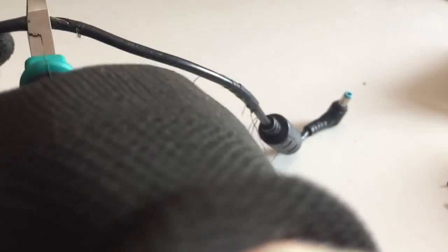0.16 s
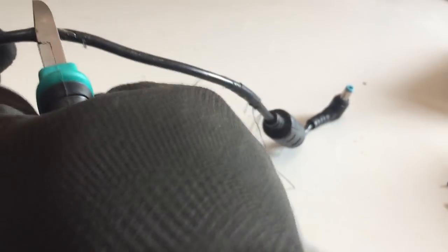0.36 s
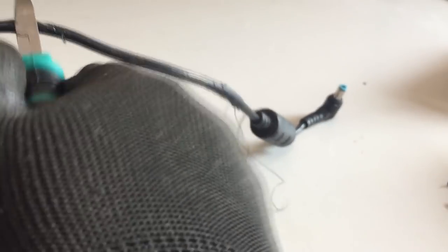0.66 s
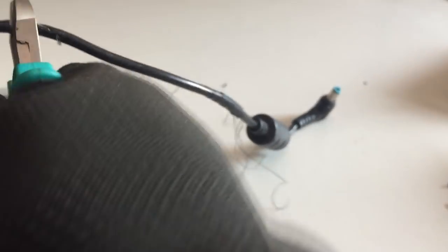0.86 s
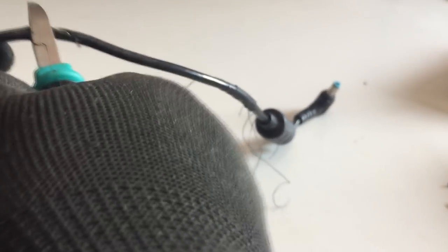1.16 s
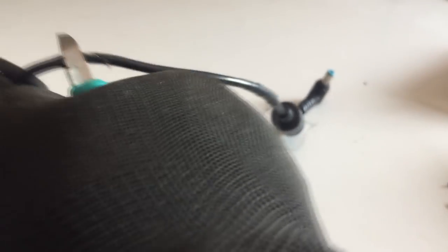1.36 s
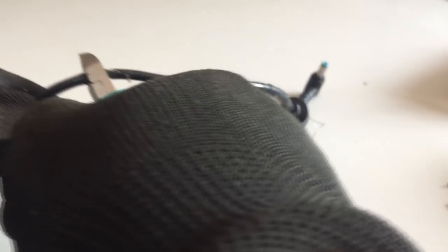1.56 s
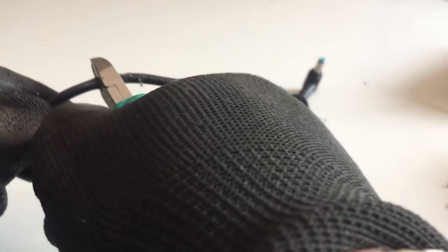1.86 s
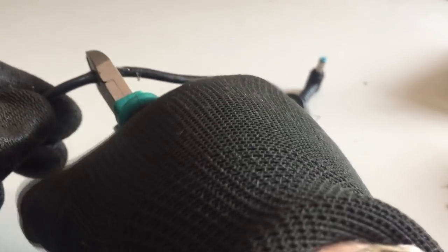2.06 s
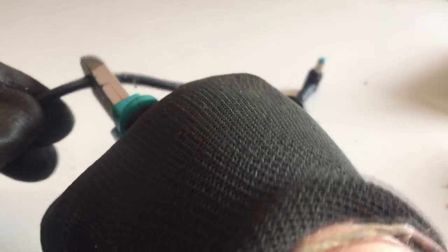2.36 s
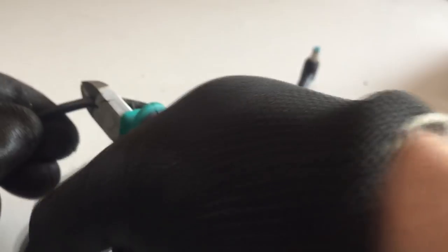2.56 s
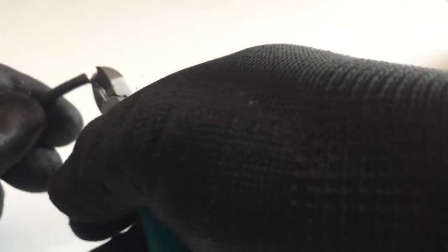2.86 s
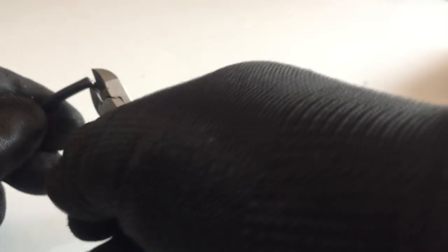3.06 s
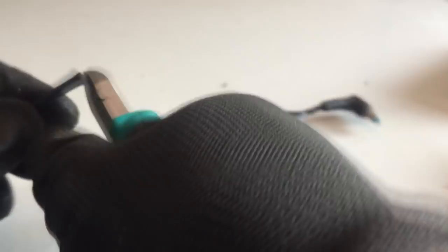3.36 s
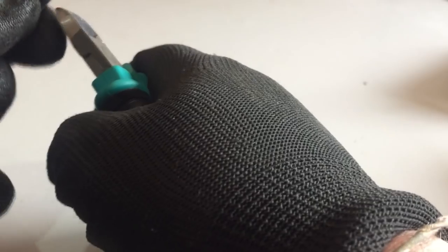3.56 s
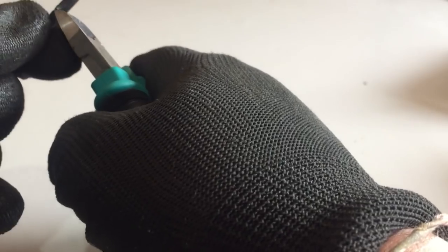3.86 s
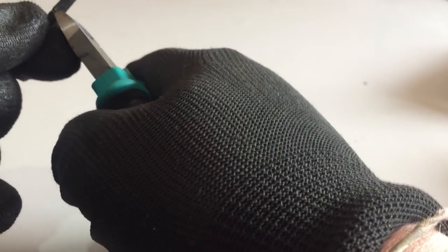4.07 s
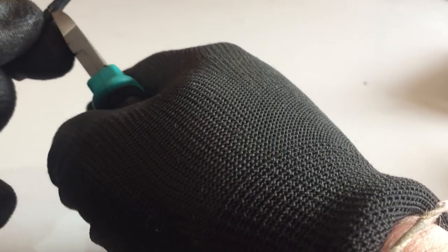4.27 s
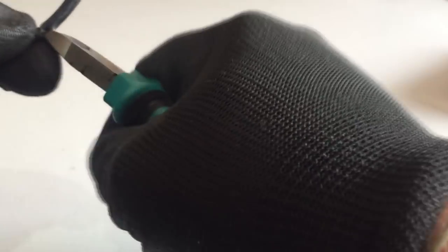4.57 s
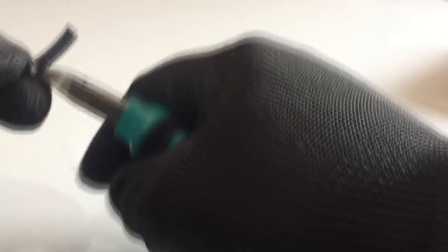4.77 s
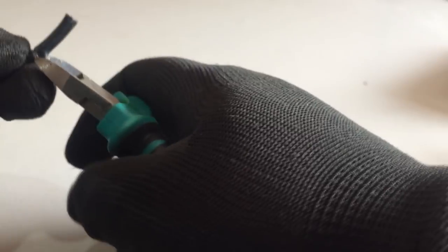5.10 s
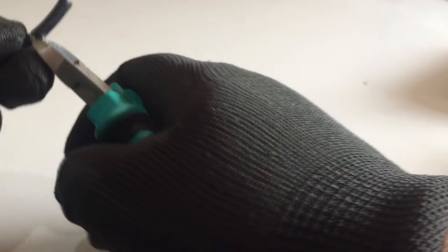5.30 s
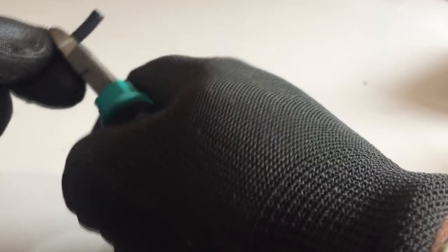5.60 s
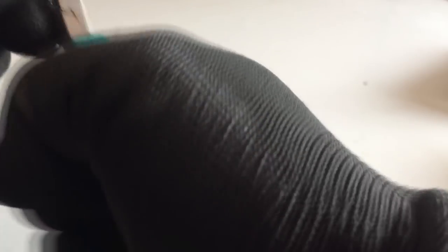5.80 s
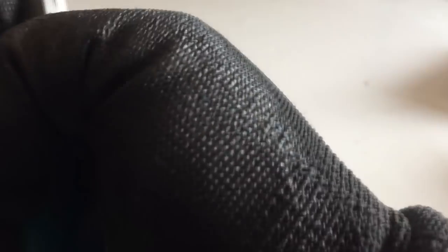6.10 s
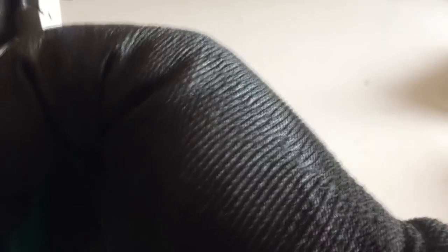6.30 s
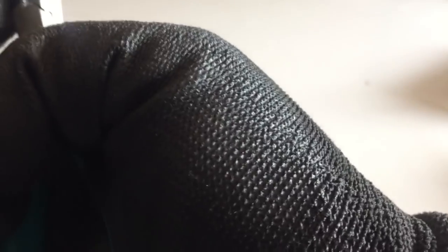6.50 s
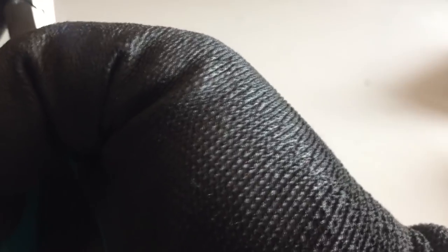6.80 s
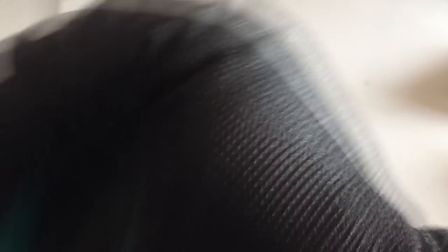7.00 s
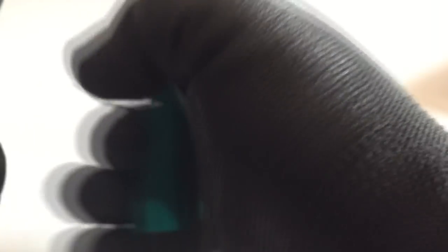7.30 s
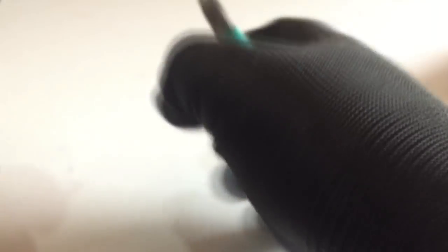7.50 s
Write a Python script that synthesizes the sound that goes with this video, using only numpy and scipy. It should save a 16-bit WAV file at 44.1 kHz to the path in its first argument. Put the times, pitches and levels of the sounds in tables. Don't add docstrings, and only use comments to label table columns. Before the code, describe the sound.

Close phone pickup at a workbench in a quiet, slightly live room with low rumble and soft hiss. Faint glove rubs and distant bird whistles lead to one loud, blunt cable snap with a woody bench boom. The plug end bounces in a quick clatter, cut off abruptly. Sparse ticks follow, then a crackling tear with two crisp snaps, glove crackles and a small hollow tube skipping on the bench.

```python
import sys
import numpy as np
from scipy import signal
from scipy.fft import rfft, irfft
from scipy.io import wavfile
from scipy.ndimage import uniform_filter1d

SR = 44100
rng = np.random.default_rng(int(sys.argv[2]) if len(sys.argv) > 2 else 0)


def generate_wav(sig):
    pcm = np.round(np.clip(np.atleast_2d(sig).T, -1, 1) * 32767).astype(np.int16)
    wavfile.write(sys.argv[1], SR, pcm)


def ratio_of_db(decibels):
    return 10 ** (np.asarray(decibels, float) / 20)


N = 337365
CHANGE_S = 3.5112

# start_s, peak_db, colour_hz, room_db, bench_db
SNAP = [
    (2.2043, -8.5, 2595, -26.5, -30.5),
]
# start_s, peak_db,
# colour_hz, room_db, bench_db
KNOCKS = [(.0864, -35.5, 425, -30.5, -61.5), (.0872, -43.5, 2030, -17.5, -78.5),
          (2.6038, -33.5, 503, -28, -49.5), (2.632, -51, 1100, -25, -85), (2.9986, -24, 694, -29, -56.5),
          (3.0025, -31, 420, -20.5, -53), (3.0222, -23.5, 1137, -20, -83),
          (3.0256, -30, 1740, -15.5, -49.5), (3.0365, -43, 1980, -20, -70), (3.0475, -49, 1700, -19, -70),
          (3.0505, -34, 1500, -16, -70), (3.0565, -42, 1250, -9, -73), (3.0635, -39, 1200, -14, -72),
          (3.3285, -33, 600, -20.5, -59), (3.3463, -41.5, 815, -21.5, -63),
          (3.4595, -43.5, 1950, -15, -51.5), (3.4902, -33, 682, -23, -57), (3.4974, -37.5, 453, -35, -75),
          (3.5059, -24, 950, -9, -55), (7.4085, -40, 300, -32, -60.5)]


def log_read(table, hz):
    f, value = np.transpose(table)
    return np.interp(np.log(np.maximum(hz, 1)), np.log(f), value)


def filtered(x, gain_at):
    y = irfft(rfft(x) * gain_at(np.fft.rfftfreq(len(x), 1 / SR)), len(x))
    return y / np.std(y)


def add(out, start_s, x):
    i = int(round(start_s * SR))
    a, b = max(i, 0), min(i + len(x), N)
    out[a:b] += x[a - i:b - i]


def walk(rate_hz, size):
    hold = max(int(SR / rate_hz), 1)
    levels = np.repeat(rng.standard_normal(size // hold + 1), hold)
    return np.sqrt(1.5) * uniform_filter1d(levels, hold)[:size]


def rings(t, hz, width, gain, phase, lag_s, push_s):
    t = np.maximum(t - lag_s * np.sqrt(500 / hz), 0)
    push = 1 - np.exp(-(t / push_s) ** 2)
    decay = np.exp(-np.pi * width * t)
    return (gain * decay * np.sin(2 * np.pi * hz * t + phase) * push).sum(0)


def hits(rows, modes, reach_octaves, push_cycles, lag_s, scatter_db, crack_db, dry, send):
    hz, width, db = np.transpose(modes)[:, :, None]
    t = np.arange(SR // 40) / SR
    f = np.fft.rfftfreq(len(t), 1 / SR)
    turns = np.pi * np.arange(len(modes))[:, None]
    chance = rng.standard_normal((len(rows), 3, len(modes), 1))
    cracks = np.diff(rng.standard_normal((len(rows), len(t) + 1))) * np.exp(-t / 0.00048)
    blows = np.array(rows)[:, :4]
    for (start_s, peak_db, colour_hz, room_db), (detune, weight, phase), crack in zip(blows, chance, cracks):
        reach = np.where(hz > colour_hz, reach_octaves[1], reach_octaves[0])
        gain = ratio_of_db(db) * np.exp(-(np.log2(hz / colour_hz) / reach) ** 2)
        ring = rings(t, hz * (1 + 0.02 * detune), width, gain * ratio_of_db(scatter_db * weight),
                     turns + 0.5 * phase, lag_s, push_cycles / colour_hz)
        ring = ring / np.abs(ring).max() + ratio_of_db(crack_db) * crack
        add(dry, start_s - lag_s * np.sqrt(500 / colour_hz), ratio_of_db(peak_db) * ring)
        power = (gain ** 2 / width / (1 + ((f - hz) / (0.62 * width)) ** 4)).sum(0)
        power = power * f ** 2 / (f ** 2 + 900 ** 2)
        blur = np.fft.fftshift(irfft(np.sqrt(power), len(t)))
        blur = blur * np.linalg.norm(ring) / np.linalg.norm(blur)
        add(send, start_s - t[-1] / 2, blur * ratio_of_db(peak_db + room_db + 12.0))


def cable_snap(dry, send):
    # mode_hz, width_hz, level_db
    jaw_modes = [(423, 1100, 10.5), (1900, 690, 7), (3700, 1300, 2), (4800, 680, -3), (6700, 960, -0.5),
                 (8280, 1500, -33.5), (11700, 1300, -28.5), (14620, 1000, -28.5)]
    hits(SNAP, jaw_modes, reach_octaves=(4.0, 4.1), push_cycles=.85, lag_s=0.00024,
         scatter_db=0., crack_db=-20.0, dry=dry, send=send)


def plug_knocks(dry, send):
    # mode_hz, width_hz, level_db
    plug_modes = [(248, 280, 16), (420, 118, 4.5), (767, 256, 5.5), (980, 207, 4.5), (1350, 700, 13),
                  (1950, 410, -1.5), (2380, 300, 2), (3500, 250, -5), (4100, 180, -18), (6200, 1500, -14)]
    hits(KNOCKS, plug_modes, reach_octaves=(1.3, 1.4), push_cycles=0.33, lag_s=0.00038,
         scatter_db=0.25, crack_db=-55, dry=dry, send=send)


def sheath_skips(dry, send):
    # mode_hz, width_hz, level_db
    tube_modes = [(383, 310, 12), (910, 350, -1), (1620, 890, 0), (1950, 590, -3), (2570, 300, -4.5),
                  (3160, 290, -8.5), (3880, 800, -6), (4800, 790, -15), (6600, 810, -33), (9200, 420, -26),
                  (12000, 830, -12)]
    # start_s, peak_db, colour_hz, room_db
    skips = [
        (7.4068, -24.5, 2180, -16.5),
        (7.4093, -35, 2230, -44),
        (7.4144, -38, 714, -36),
        (7.4502, -39.5, 1900, -11),
        (7.4613, -35.5, 2020, -26),
        (7.5053, -43.5, 1300, -12.5),
        (7.5332, -39, 2350, -24),
        (7.554, -55, 7000, -29),
    ]
    # start_s, peak_db, colour_hz, room_db
    wobbles = [(7.4125, -48, 2600, -30), (7.433, -43, 1710, -18), (7.4365, -43, 1950, -25),
               (7.4405, -44, 2300, -33), (7.4545, -45, 1700, -18), (7.4635, -36, 2680, -25),
               (7.470, -41.5, 1900, -17), (7.489, -48, 2800, -25), (7.508, -43, 2680, -31),
               (7.517, -45, 2000, -26), (7.521, -52, 2200, -24), (7.5355, -43.5, 2700, -32),
               (7.545, -53, 2600, -26), (7.559, -51, 1800, -28)]
    hits(skips, tube_modes, reach_octaves=(1.5, 2.2), push_cycles=0.14, lag_s=0.0012,
         scatter_db=1.7, crack_db=-39, dry=dry, send=send)
    hits(wobbles, tube_modes, reach_octaves=(.4, .4), push_cycles=0.93, lag_s=0,
         scatter_db=1.2, crack_db=-56, dry=dry, send=send)


def fingertip_pops(dry, send):
    # start_s, peak_db, colour_hz, room_db
    pops = [(7.0765, -44.5, 1900, -21), (7.078, -41.5, 2800, -28), (7.083, -49, 2380, -28),
            (7.0905, -41, 2940, -25), (7.097, -49, 5600, -25), (7.102, -52, 2200, -23),
            (7.1068, -48, 6200, -22), (7.1185, -46, 6340, -22), (7.1227, -47, 5700, -25),
            (7.1262, -50, 3600, -22), (7.130, -46, 6700, -25), (7.1473, -40, 5900, -25),
            (7.154, -52, 5900, -28), (7.2315, -54, 6000, -29), (7.248, -59, 1900, -21),
            (7.2585, -56, 2050, -27), (7.264, -55, 2400, -25), (7.281, -50, 6300, -25),
            (7.2895, -46, 6200, -21), (7.2897, -52, 2400, -29), (7.2945, -43.5, 6000, -27),
            (7.302, -55, 2600, -28), (7.3057, -42, 6200, -23), (7.3095, -50, 6200, -27),
            (7.3172, -42.5, 3480, -32)]
    # mode_hz, width_hz, level_db
    grip_modes = [(1850, 260, 0), (2500, 500, -3), (3630, 440, 5), (5840, 600, -2), (6450, 720, 2),
                  (7700, 800, 0)]
    hits(pops, grip_modes, reach_octaves=(.3, .3), push_cycles=0.99, lag_s=0,
         scatter_db=1.2, crack_db=-60, dry=dry, send=send)


def blade_ticks(dry, send):
    # mode_hz, width_hz, level_db
    blade_modes = [(1800, 500, 13), (2550, 490, 1.5), (4000, 900, -1.5), (6334, 840, -2.5),
                   (9150, 1020, -5.5), (10900, 1700, -5), (13900, 1100, -8), (15500, 1100, -17)]
    # start_s, peak_db, colour_hz, room_db
    partings = [
        (2.2113, -34, 2560, -17),
        (2.2472, -44.5, 2820, -46),
        (6.1504, -17.5, 4900, -33),
        (6.174, -18.5, 4800, -31.5),
    ]
    # start_s, peak_db, colour_hz
    nicks = [(3.4598, -43, 4800), (4.4719, -71, 6130), (4.4967, -47, 7200), (4.5668, -48.5, 4200),
             (4.5705, -45.5, 4800), (4.5862, -53, 5550), (4.6513, -51, 6860), (4.6678, -51.5, 5020),
             (4.6899, -51.5, 6180), (4.7261, -45.5, 5960), (6.7733, -40.5, 6955), (6.8107, -56, 3790),
             (6.8942, -58.5, 4100), (6.9994, -53, 4900)]
    # start_s, peak_db, colour_hz
    tears = [(6.0088, -59, 6400), (6.0118, -40.5, 5040), (6.0737, -54, 3020), (6.0894, -45, 4300),
             (6.0946, -43, 5880), (6.099, -40, 3900), (6.1028, -43, 8450), (6.1202, -39, 4240),
             (6.1253, -39, 6770), (6.1443, -42, 5820), (6.1989, -54, 5510), (6.2819, -42, 7360)]
    # start_s, peak_db, colour_hz
    catches = [(7.1261, -40, 5390), (7.1448, -34.5, 7100), (7.2216, -46, 5230), (7.2305, -46, 5960),
               (7.2586, -49, 3500), (7.3057, -45, 5950), (7.5332, -46.5, 5000)]
    ticks = [*partings]
    for rows, room_db in ((nicks, -20.5), (tears, -16.5), (catches, -15.5)):
        ticks += [(*row, room_db) for row in rows]
    thin, thin_send = np.zeros(N), np.zeros(N)
    hits(ticks, blade_modes, reach_octaves=(.85, 1.9), push_cycles=0.26, lag_s=0,
         scatter_db=2.4, crack_db=-18.0, dry=thin, send=thin_send)
    small = signal.butter(10, 1620, "high", fs=SR, output="sos")
    dry += signal.sosfilt(small, thin)
    send += signal.sosfilt(small, thin_send)


def bench_boom(out):
    # mode_hz, level_db, t60_s
    bench_modes = [(58, -3.5, 0.73), (67, -11, .25), (105.9, 7.5, 0.13), (126, -4, 0.76), (138, -14, .12),
                   (197, -7.5, 0.31), (207.7, -9.5, 0.16), (284, -18, 0.63), (296, -13, 0.45),
                   (333.6, -16.5, 0.26), (381.5, -13.5, 0.27), (387.3, -10, 0.35), (497, -20.5, 0.11),
                   (716, -26, 0.4)]
    t = np.arange(SR) / SR
    hz, db, t60_s = np.transpose(bench_modes)[:, :, None]
    width = np.log(1000) / np.pi / t60_s
    for rows, tilt in ((SNAP, 0), (KNOCKS, .8)):
        waver_db = 2.9 * np.array([walk(33, SR) for _ in bench_modes])
        gain = ratio_of_db(db + waver_db) * (hz / 200) ** tilt
        boom = rings(t, hz, width, gain, phase=0, lag_s=0.0016, push_s=0.0046)
        boom = boom * (1 + 0.71 * np.exp(-t / 0.0064))
        boom = boom * (1 - np.exp(-((t - .042) / 0.0037) ** 2))
        for start_s, *_, bench_db in rows:
            heard = np.clip((CHANGE_S - start_s - t) / .002, 0, 1) if start_s < CHANGE_S else 1
            add(out, start_s, ratio_of_db(bench_db) * boom * heard)


def hand_bumps(out):
    # start_s, peak_db, pitch_hz, cycles
    bumps = [
        (1.751, -57.5, 129, 19.5),
        (2.10, -56, 127, 4.8),
        (6.195, -57.5, 126, 2.6),
        (7.0789, -33, 76, 1.3),
        (7.094, -49, 62.4, 2),
    ]
    for start_s, db, hz, cycles in bumps:
        t = np.arange(int(SR * cycles / hz)) / SR
        swell = np.sin(np.pi * t * hz / cycles)
        add(out, start_s, -ratio_of_db(db) * swell * np.sin(2 * np.pi * hz * t))


def friction(out, start_s, length_s, db, hz, width_hz, hiss_db):
    # frequency_hz, level_db
    fabric_hiss = [(3000, -7), (4900, -10.5), (5700, 3.5), (6500, -0.5), (7600, -5), (8800, -1.5),
                   (10500, -10.5), (12000, -6), (14500, -8), (16000, -20)]
    n = int(length_s * SR)
    grip_db = 4.9 * np.minimum(rng.exponential(size=SR // 2), 4) + 1.7 * walk(250, SR // 2)
    grain = rng.standard_normal((2, SR // 2)) * ratio_of_db(grip_db)
    body = filtered(grain[0], lambda f: 1 / (1 + ((f - hz ** 2 / (f + 1)) / width_hz) ** 2))
    hiss = filtered(grain[1], lambda f: ratio_of_db(log_read(fabric_hiss, f)))
    swell = np.sin(np.pi * np.arange(n) / n) ** 0.33
    add(out, start_s, ratio_of_db(db) * swell * (body + ratio_of_db(hiss_db) * hiss)[:n])


def glove_slips(out):
    # start_s, length_s, level_db, pitch_hz, hiss_db
    slips = [(.006, 0.038, -66.5, 3340, 4), (0.052, 0.041, -64.5, 2980, -1),
             (0.588, 0.055, -68.5, 3200, -1.5), (0.61, 0.031, -65, 3340, 1.5),
             (0.786, 0.069, -65.5, 3200, -5.5), (3.266, 0.037, -71.5, 4000, -10.5),
             (3.387, 0.099, -68, 4000, -20), (4.362, 0.41, -89, 3800, 12.5),
             (6.082, 0.045, -65.5, 4100, -1), (6.272, 0.34, -78.5, 4100, -28),
             (7.074, 0.012, -52.5, 2400, -3), (7.081, 0.054, -58.5, 2500, 6),
             (7.107, 0.054, -65, 2400, 8.5), (7.213, 0.079, -67.5, 2100, 3.5),
             (7.262, 0.06, -68.5, 2200, 7), (7.286, 0.041, -67.5, 2300, 7), (7.502, 0.078, -66, 2400, -10)]
    for start_s, length_s, db, hz, hiss_db in slips:
        friction(out, start_s, length_s, db, hz, 1670, hiss_db)


def fabric_slides(out):
    # start_s, length_s, level_db, pitch_hz
    slides = [(1.001, 0.12, -79, 2040), (1.3, 0.059, -78, 5460), (2.171, 0.14, -69.5, 2500),
              (2.547, 0.11, -76.5, 5540), (2.731, 0.12, -75.5, 4400), (5.447, 0.14, -76.5, 3700),
              (5.756, 0.16, -74.5, 3500), (6.007, 0.007, -52.5, 3800), (6.009, 0.032, -71, 3500),
              (6.172, 0.076, -68.5, 4500), (6.256, 0.08, -68.5, 3700), (7.033, 0.083, -69.5, 2070),
              (7.159, 0.18, -74, 2000), (7.303, 0.21, -76.5, 2500)]
    for start_s, length_s, db, hz in slides:
        friction(out, start_s, length_s, db, hz, 0.47 * hz, hiss_db=-2)


def rubber_creaks(out):
    # start_s, length_s, level_db, pitch_hz
    creaks = [(0.096, 0.034, -63.5, 1650), (0.603, 0.052, -65.5, 1060), (0.792, 0.052, -70, 1320),
              (.8, .04, -68, 3400), (6.213, .03, -71, 4200), (6.272, 0.18, -78, 4000),
              (3.31, 0.22, -60, 126), (3.346, 0.029, -60, 1220), (3.455, 0.0082, -48, 1950),
              (4.934, 0.045, -64.5, 1280), (4.969, 0.021, -71, 2230), (4.977, 0.02, -58.5, 1260),
              (7.065, 0.026, -75, 446), (7.133, .026, -61.5, 1700), (7.24, 0.016, -63, 1900)]
    for start_s, length_s, db, hz in creaks:
        friction(out, start_s, length_s, db, hz, 0.33 * hz, hiss_db=-20)


def jacket_squeaks(out):
    # start_s, length_s, level_db, pitch_hz
    squeaks = [
        (.25, .02, -68, 1150),
        (0.261, 0.048, -68, 1019),
        (0.325, 0.099, -78, 980),
        (2.45, 0.18, -75.5, 539),
        (2.61, 0.03, -67.5, 580),
        (7.273, 0.0049, -57, 1900),
    ]
    for start_s, length_s, db, hz in squeaks:
        friction(out, start_s, length_s, db, hz, 0.042 * hz, hiss_db=-20)


def shell_rattles(out):
    # start_s, level_db
    rattles = [
        (3.332, -63),
        (3.3855, -67),
    ]
    # delay_s, length_s, level_db, pitch_hz
    shell_parts = [
        (0.0005, .012, 0, 3750),
        (.004, .014, -2, 4380),
        (-.001, .008, -8, 5760),
    ]
    for start_s, db in rattles:
        for delay_s, length_s, part_db, hz in shell_parts:
            friction(out, start_s + delay_s, length_s, db + part_db, hz, 330, hiss_db=-26)


def room_answer():
    # frequency_hz, t60_s
    decay_times = [(150, 0.86), (500, 0.36), (1500, 0.4), (3000, 0.36), (6000, 0.3556), (12000, 0.088)]
    # frequency_hz, level_db
    wall_colour = [(150, 4.5), (2000, -6), (3500, -5), (7000, -13.5), (10000, -8.5), (16000, -1.5)]
    t = np.arange(SR // 2) / SR
    out = 0
    for hz in 60 * 2 ** np.arange(0, 8.1, .5):
        noise = rng.standard_normal(len(t))
        band = filtered(noise, lambda f: np.exp(-(2 * np.log2((f + 1) / hz)) ** 2 * 2))
        level_db = log_read(wall_colour, hz) - 60 * t / log_read(decay_times, hz)
        out = out + band * np.sqrt(hz) * ratio_of_db(level_db)
    out = out * np.clip((t - .0035) / 0.00093, 0, 1)
    return out / np.sqrt(np.sum(out ** 2))


def birds():
    # start_s, length_s, start_hz, end_hz, level_db
    whistles = [(1.105, 0.048, 6600, 6600, -70.5), (1.1, 0.065, 5980, 6200, -68),
                (1.344, 0.11, 6700, 6900, -76), (1.517, 0.024, 6300, 6110, -68.5),
                (1.848, 0.03, 7130, 6940, -76), (1.898, .17, 3920, 4660, -81),
                (3.983, 0.15, 3920, 4280, -79), (4.10, 0.058, 4370, 4630, -65.5),
                (4.16, 0.06, 3050, 3090, -77.5), (4.216, 0.034, 3180, 3230, -66),
                (4.26, 0.1, 3200, 3420, -78.5), (4.408, 0.023, 6040, 6120, -67),
                (4.44, 0.07, 6130, 6000, -77), (4.67, 0.071, 6680, 6660, -77),
                (4.822, 0.051, 6250, 6200, -81), (6.058, 0.07, 3950, 4200, -70),
                (6.131, 0.04, 4300, 4530, -63), (6.212, 0.23, 3020, 3500, -78)]
    out = np.zeros(N)
    for start_s, length_s, start_hz, end_hz, db in whistles:
        u = np.linspace(0, 1, int(length_s * SR))
        hz = (start_hz + (end_hz - start_hz) * u) * (1 + 0.003 * walk(60, SR // 4)[:len(u)])
        add(out, start_s, ratio_of_db(db) * np.sin(np.pi * u) ** .6 * np.sin(2 * np.pi * np.cumsum(hz) / SR))
    t = np.arange(SR // 2) / SR
    echo = rng.standard_normal(SR // 2) * ratio_of_db(-60 * t / .5)
    echo = echo / np.sqrt(np.sum(echo ** 2))
    return out + ratio_of_db(-8) * signal.fftconvolve(out, echo)[:N]


def air():
    # frequency_hz, level_db per Hz
    hiss_colour = [(15, -72), (25, -40.5), (43, -3.5), (157, -1), (326, -9), (394, -13), (531, -15.5),
                   (2410, -20), (3160, -20), (3820, -20.5), (4490, -23), (4870, -23.5), (7920, -27.5),
                   (12900, -33.5), (16000, -54.5)]
    still = filtered(rng.standard_normal(N), lambda f: ratio_of_db(log_read(hiss_colour, f)))
    low = signal.sosfilt(signal.butter(1, 600, fs=SR, output="sos"), still)
    low_db = 0.54 * walk(4.5, N) + 3.5 * (np.arange(N) < CHANGE_S * SR)
    high = (still - low) * ratio_of_db(.5 * walk(1.89, N))
    return ratio_of_db(-69.5) * (high + low * ratio_of_db(low_db))


def scene():
    dry, send = np.zeros(N), np.zeros(N)
    for struck in (cable_snap, plug_knocks, sheath_skips, fingertip_pops, blade_ticks):
        struck(dry, send)
    dry = signal.sosfilt(signal.butter(2, 140, "high", fs=SR, output="sos"), dry)
    before = np.arange(N) < CHANGE_S * SR
    ahead_s = CHANGE_S - np.arange(N) / SR
    fade = np.where(ahead_s > -.03, np.clip(ahead_s / .001, 0, 1), 1)
    answer = room_answer()
    wet = [signal.fftconvolve(send * part, answer)[:N] * part for part in (before, ~before)]
    out = (dry + sum(wet)) * fade
    for source in (bench_boom, hand_bumps, glove_slips, fabric_slides, rubber_creaks, jacket_squeaks, shell_rattles):
        source(out)
    return (out + birds() + air())[None]


def low_pass(x):
    return signal.sosfilt(signal.butter(12, 16830, fs=SR, output="sos"), x)


def record(dry):
    dip = np.clip(np.abs(np.arange(N) / SR - CHANGE_S - .001) / 0.0087, .2, 1)
    low_cut = signal.butter(3, 40, "high", fs=SR, output="sos")
    top_cut = signal.ellip(6, .3, 50, 16200, fs=SR, output="sos")
    mix = signal.sosfilt(np.vstack([low_cut, top_cut]), dry * dip)
    return low_pass(mix)


dry = scene()
out = record(dry)
generate_wav(out)
```